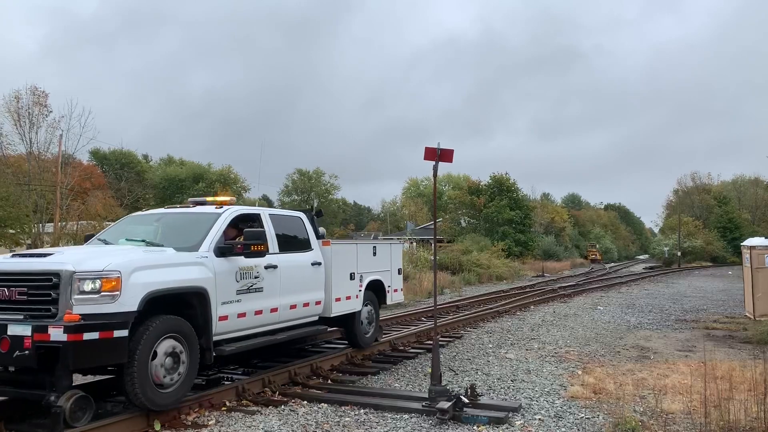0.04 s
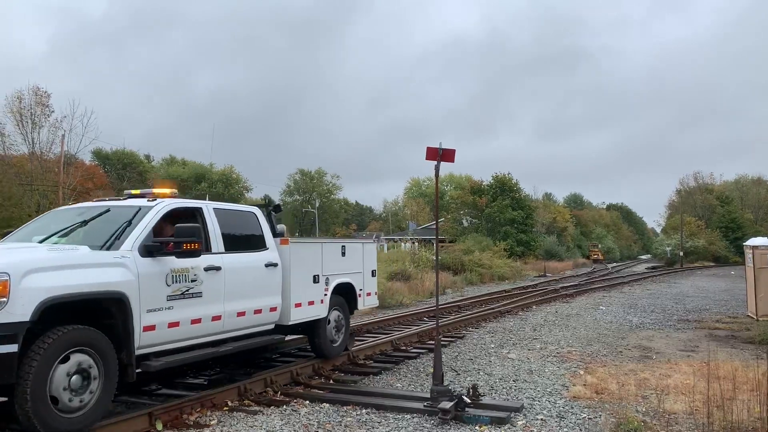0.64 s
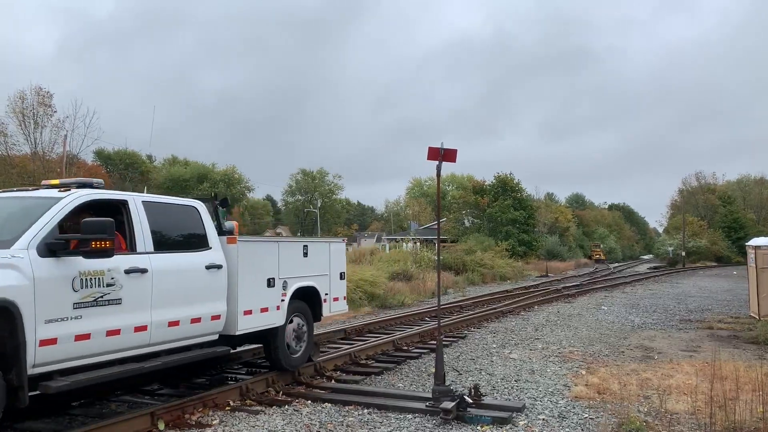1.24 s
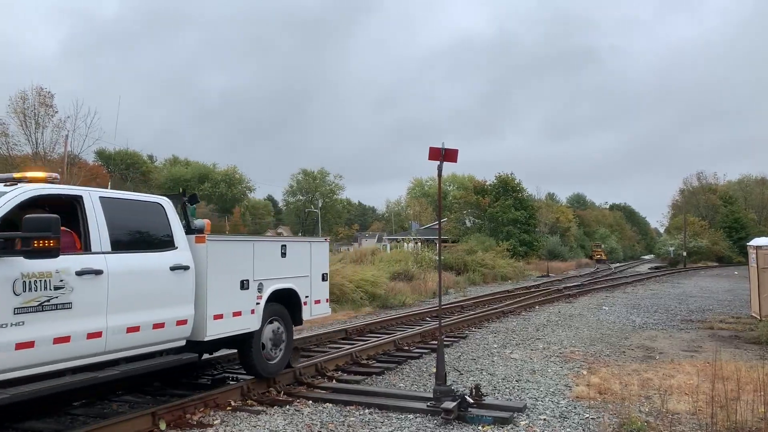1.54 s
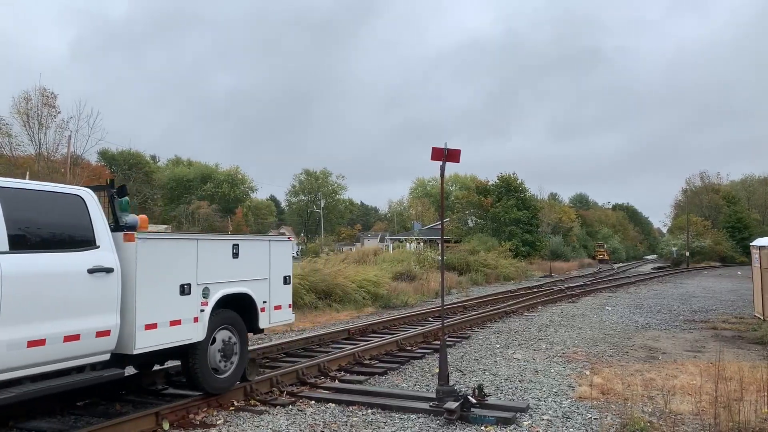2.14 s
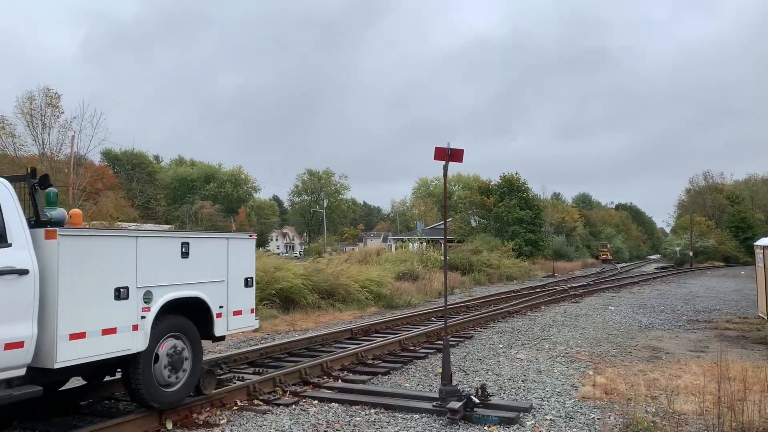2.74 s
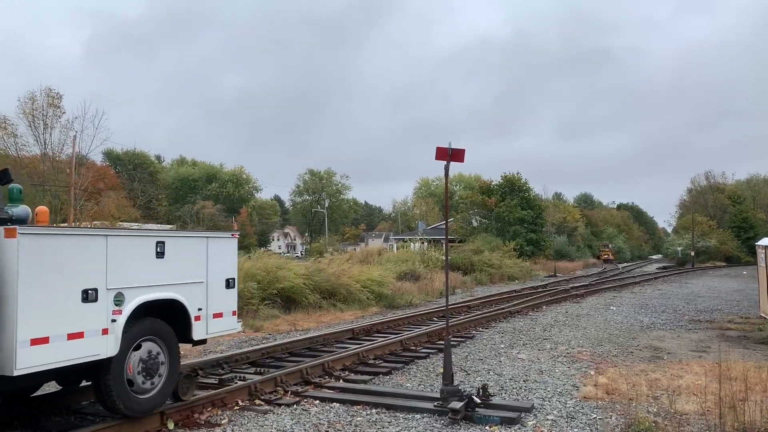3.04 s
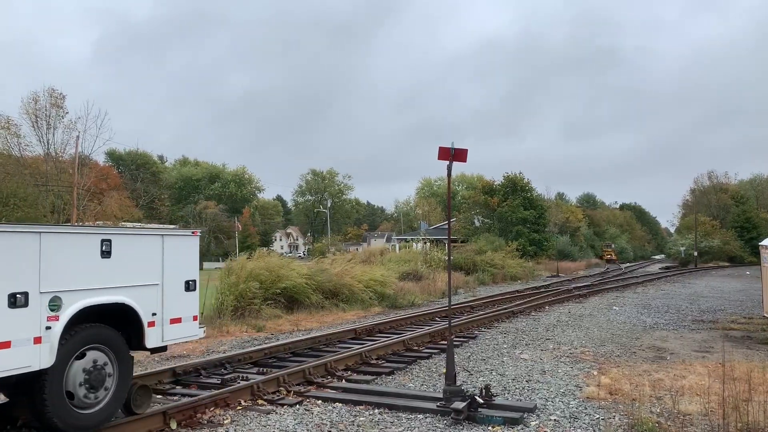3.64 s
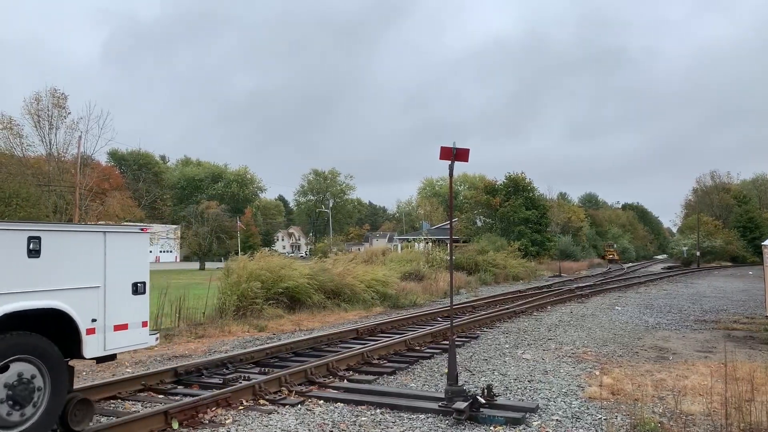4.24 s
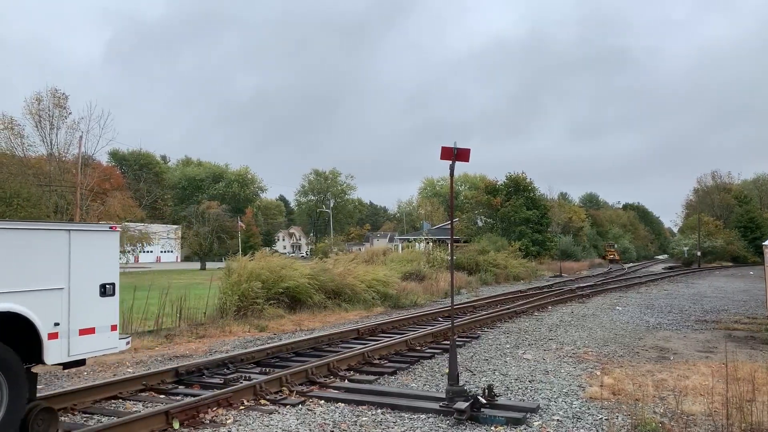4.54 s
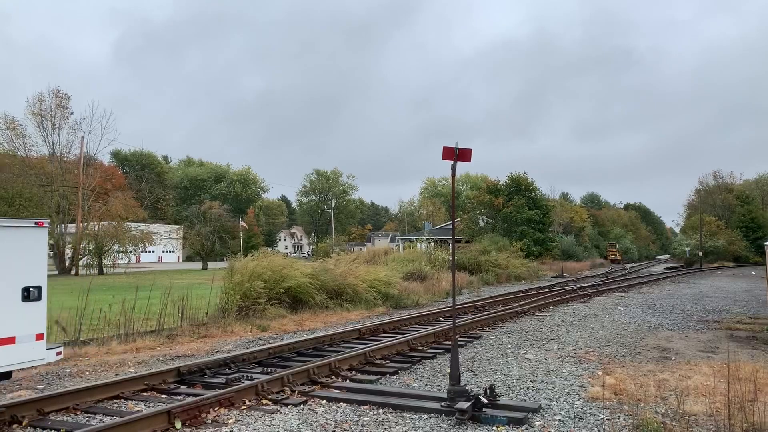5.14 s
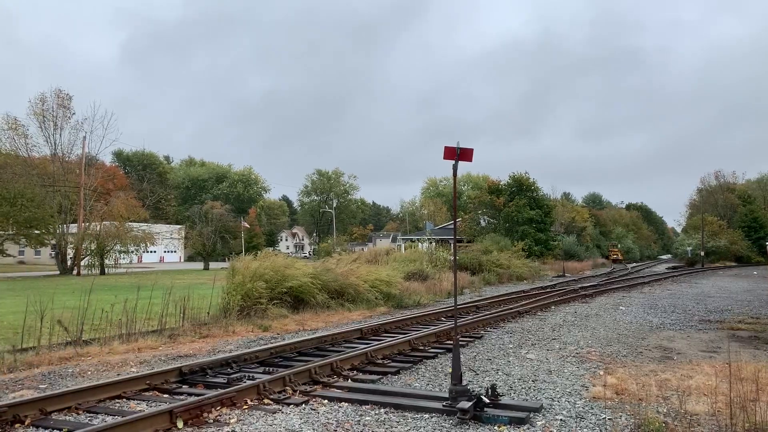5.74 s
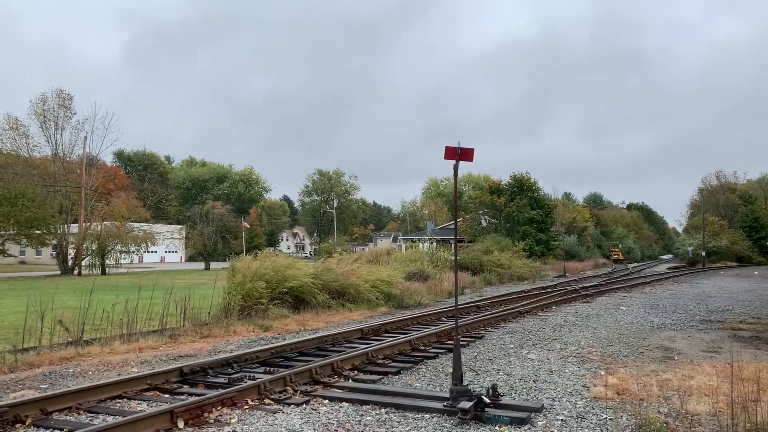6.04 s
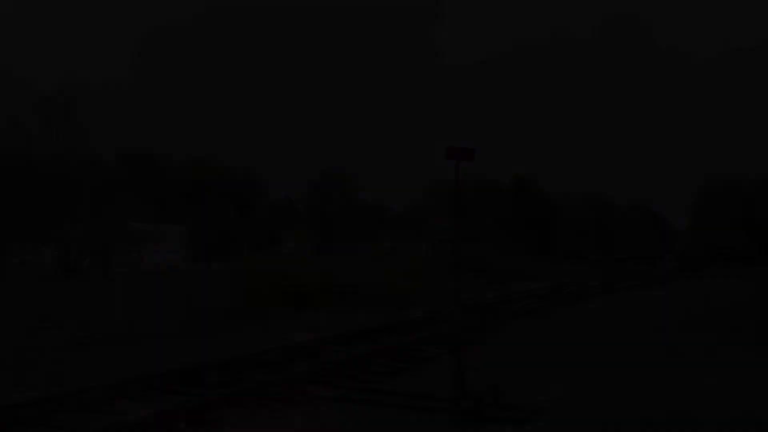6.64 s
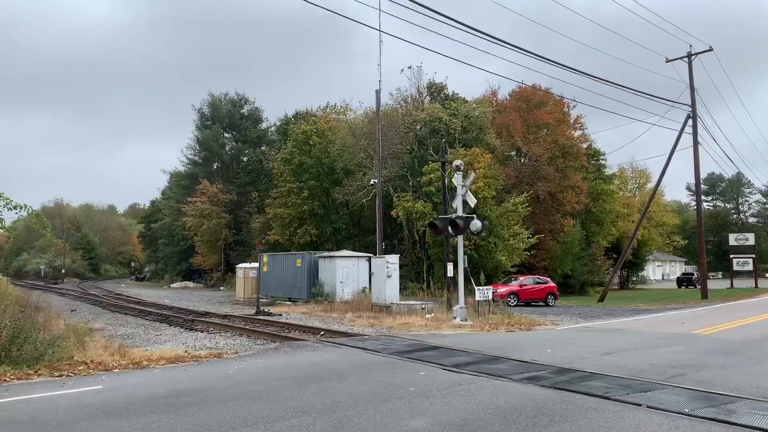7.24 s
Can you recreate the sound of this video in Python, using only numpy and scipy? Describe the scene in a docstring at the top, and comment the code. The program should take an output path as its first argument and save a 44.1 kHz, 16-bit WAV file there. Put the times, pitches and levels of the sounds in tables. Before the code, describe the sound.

A pickup truck rolls slowly along railway tracks, close and to the left, with a steady low engine hum and a lumpy, groaning rumble from its steel guide wheels. The wheels knock and thump over rail joints at about 0.2, 0.4 and 1.7 seconds, sharply at 2.9, and again at 4.3, with a few brief, thin squeaks and slight crunches of grit. The rumble gradually eases as the truck moves by. A faint cricket chirps throughout, and dry insect ticks join from about 3.7 seconds. Near 6 seconds the engine revs up, its exhaust booming and its hiss growing, with two more clanks around 6.3 and 6.6. At about 6.6 seconds the sound cuts to quieter open air: distant traffic, a far idling engine, two small ticks and a very faint bird note, ending around 7.5 seconds.

```python
"""Hi-rail pickup rolling by

A pickup idles slowly past on the track, its steel guide wheels roaring, groaning and knocking over the
joints of a switch. Once it is by, the V8 revs up; a cricket and a katydid scrape their wings on the
verge. At 6.645 s the scene cuts to a level crossing with distant traffic and a far idling engine."""
import sys
import numpy as np
from scipy import signal
from scipy.io import wavfile
from scipy.ndimage import map_coordinates

SR = 44100
rng = np.random.default_rng(int(sys.argv[2]) if len(sys.argv) > 2 else 0)


def store_pcm(level_fs):
    """Save levels as 16-bit WAV."""
    pcm = np.round(np.clip(level_fs, -1, 1) * 32767).astype(np.int16)
    wavfile.write(sys.argv[1], SR, np.atleast_2d(pcm).T)


N = 330750
TIME = np.arange(N) / SR
CUT_S, IDLE_FIRINGS_PER_S = 6.645, 41

# Levels are in dB; some layers add an overall gain.
# engine speed, idling and then revving up: t/s, firing rate/Hz
ENGINE_SPEED = [(0, 40.5), (5.9, 44.1), (6.0, 48.5), (6.16, 65.2), (6.3, 83), (6.45, 88), (6.62, 87)]
# drone of the engine block: multiple of the firing rate, level/dB
BLOCK_ORDERS = [(1, -39), (2, -39.5)]
# note of the tailpipe: multiple of the firing rate, level/dB
PIPE_ORDERS = [(1, 8.5), (2, 3), (4, -12)]
# exhaust response, with two booms that the rising note sweeps through: f/Hz, level/dB
MUFFLER = [(41, -13), (64, 11.5), (82, 1.5), (130, -3.5), (156, 13), (170, -10), (360, -1)]
# tailpipe resonances: low f/Hz, high f/Hz, level/dB
PIPE_BANDS = [(149, 183.4, -1.5), (251, 316, -10)]
# the rear of the truck comes round: t/s, tailpipe level/dB, whir level/dB
REAR_LEVELS = [(0, -35.5, -60), (2.5, -61.5, -90), (4, -45.5, -59), (5, -43, -52.5), (5.9, -40.5, -57)]
# hum of the cooling fan: t/s, f/Hz, level/dB
FAN_HUM = [(0, 103, -32.5), (1.2, 97.36, -36.5), (2.5, 96.73, -34.5), (5.9, 98.24, -37.5), (6.4, 108, -37)]
# spectra of the engine bay's rush and high hiss: f/Hz, level/dB
RUSH_SPECTRUM = [(230, 1.5), (420, 2), (620, 1.1), (850, 0.5), (1200, -3), (1700, -5.5), (2200, -9),
                 (2900, -10.5), (3500, -18.5), (4300, -14.5), (5400, -20.5), (6600, -20.5), (9000, -75)]
HISS_SPECTRUM = [(5200, -9), (7000, 0), (8400, 2.5), (9800, -1), (11500, -4), (13000, 1.5), (14200, 1.5),
                 (16500, -6)]
# frequency bands of the revving engine's rasp: low f/Hz, high f/Hz, level/dB
RASP_BANDS = [(1275, 1350, -3), (1770, 2030, 2.5), (2290, 2950, 2.5), (3770, 4080, -2.5), (4140, 4770, -2)]
# bands of a fluttering midrange whir: low f/Hz, high f/Hz, level/dB, flutter/dB
WHIR_BANDS = [(1710, 2800, 0.8, 0.1), (2120, 2220, -2.5, 3), (3730, 4460, -9.5, 1), (4010, 4035, -16, -1)]
# the truck's bearing: t/s, base right-channel lag/ms
BEARING = [(0, 0.2), (1, 0.24), (2, 0.31), (3, 0.39), (4.5, 0.39), (6.6, 0.46)]
# stereo image of truck, hiss and road: f/Hz, left-right likeness (1 is mono)
TRUCK_LIKENESS = [(60, 1), (200, 0.99), (700, 0.96), (1400, 0.93), (2500, 0.82), (4500, 0.29),
                  (7000, 0.027)]
HISS_LIKENESS = [(6000, .6), (8500, .87), (14000, .87)]
ROAD_LIKENESS = [(60, 1), (300, 0.63), (1200, 0.17), (3000, 0.24), (8000, 0.22)]

# spectra of chassis shudder and guide-wheel roar: f/Hz, level/dB
SHUDDER_SPECTRUM = [(28, -32), (45, 0.5), (65, 0.5), (100, -3), (140, -12)]
ROAR_SPECTRUM = [(85, 3.5), (140, 3), (230, -3.5), (320, -4.5), (450, -15.5), (580, -11.5), (740, -12.5),
                 (1000, -32), (1400, -28), (2600, -33.5)]
# tyres jolting over rough spots of the switch: t/s, level/dB
JOLTS = [(.45, -41), (1.66, -25.5), (2.8, -33), (4.19, -31.5)]
# roughness of the rail: t/s, level/dB
RAIL_ROUGHNESS = [(0, 3), (.22, 0.5), (.58, -2.5), (.67, -4.5), (.95, -0.5), (1.25, 1.5), (1.45, 0.5),
                  (1.7, 4), (1.92, -0.5), (2.35, -2), (2.9, -2)]
# guide-wheel groans: t/s, f/Hz, level/dB, half length/s
SCRUBS = [(0.12, 191, -34.5, 0.14), (0.044, 380, -42.5, 0.088), (.4, 159.6, -38, 0.13),
          (.57, 206, -34.5, 0.049), (0.803, 369, -36, 0.13), (1.175, 209, -29.5, 0.039),
          (1.37, 212, -30, 0.2), (1.68, 260, -35.5, 0.13), (1.888, 670, -42.5, 0.49),
          (3.997, 528, -40.5, 0.3)]
# wheels over joints: t/s, bump level/dB, thump level/dB, clank level/dB, clank low-pass f/Hz,
# pitch factor, clank pan to the left/dB, right-channel lag/ms
JOINT_HITS = [(.164, -24, -26, -12, 1900, 1, 2.5, 0.43), (.197, -28, -18.5, -30, 2000, 0.97, 8, 0.15),
              (.432, -12, -31, -46, 1500, 0.88, 9, 0.3), (1.617, -12, -24, -32, 1500, 0.89, -7, .59),
              (1.703, -38, -30, -27, 2000, 0.96, 2, 0.2), (1.746, -9, -26, -29, 1500, 0.94, -1, 0.37),
              (2.898, -33, -9, -14.5, 2600, 0.99, 7, 0.32), (2.906, -23, -17.5, -19.5, 2000, 0.88, 7, 0.31),
              (4.255, -38, -19, -16, 1060, 0.96, 5, 0.46), (4.269, -15, -18, -33, 910, 0.88, 5, 0.36),
              (4.323, -51.5, -45, -28, 3000, 1.0, 1, 0.49), (6.333, -37, -20, -13, 2200, 0.89, 1.5, 0.47),
              (6.59, -38, -33, -23, 1200, 0.92, 4, 0.49)]
# modes of wheel, axle and rail (clank, thump) and of the chassis (bump): f/Hz, level/dB, t60/s
CLANK_MODES = [(470, -5, .04), (581, -3.5, .05), (715, -2.5, .055), (807, 1.5, .065), (1005, -5.5, .06),
               (1175, -1, .055), (1300, -5.5, .05), (1420, -12, .05), (1670, -17, .05)]
THUMP_MODES = [(150, -1.5, .045), (185, 1.5, .055), (250, 1.5, .065), (335, -.5, .06)]
BUMP_MODES = [(59, 3.5, .05), (95, -1, .04)]
# grit crushed under a wheel: t/s, level/dB, t60/s
GRIT = [(.165, -43, 0.18), (.197, -47.5, 0.16), (2.9, -50.5, 0.34)]
# flange squeaks: peak t/s, f/Hz, level/dB, rise/s, t60/s
SQUEAKS = [(0.202, 8570, -42, 0.0073, 0.093), (1.644, 5489, -46, 0.018, 0.14),
           (1.671, 5489, -41.5, 0.01, 0.19), (3.54, 8646, -45, 0.011, 0.11)]

# cricket chirps: t/s, level/dB, crescendo across the full strokes/dB
CHIRPS = [(0.506, -56, 1), (1.332, -55.5, -5), (2.031, -55.5, -1), (2.682, -59, 3), (3.435, -55.5, -3),
          (4.497, -59, 1), (5.179, -56.5, 0), (5.983, -57.5, -2)]
# a chirp's soft lead-in and three wing strokes: t/s from the first full one, level/dB, half length/s
WING_STROKES = [(-.05, -7, .006), (0, 1, .0065), (.065, .5, .0085), (.139, .5, .0085)]
# katydid wing ticks: t/s, f/Hz, level/dB
KATYDID_TICKS = [(3.718, 8900, -54), (3.758, 9200, -54), (3.802, 9100, -52.5), (3.848, 9200, -51),
                 (3.897, 9200, -49), (3.942, 9400, -46), (4.027, 9300, -51), (4.07, 8300, -45),
                 (4.112, 9900, -48), (4.159, 8700, -50), (4.202, 9000, -52), (4.289, 8700, -48),
                 (4.329, 8450, -47), (4.411, 8140, -48), (4.491, 8560, -50), (5.459, 9000, -46.5),
                 (6.021, 8600, -54), (6.062, 8600, -52)]

# spectrum of distant traffic: f/Hz, level/dB
TRAFFIC_SPECTRUM = [(28, -21), (65, 1.5), (85, -4), (130, -19), (200, -20), (350, -20.5), (550, -25.5),
                    (800, -26.5), (1100, -24.5), (1900, -36.5), (2800, -41), (4600, -48.5), (8000, -56.5),
                    (12000, -93)]
# far idling engine: f/Hz, level/dB, pitch wander as a share of f
FAR_ENGINE_TONES = [(44, -37, 0.012), (69.96, -39, 0.071)]
# far-off tyre drone, whir and insects: low f/Hz, high f/Hz, level/dB
FAR_BANDS = [(343, 408, -56), (476, 1000, -60), (950, 1240, -54.5), (2010, 2220, -56), (4620, 4760, -75.5)]
# small ticks at the crossing: t/s, level/dB
FAR_TICKS = [(6.775, -24), (7.348, -33)]
# a distant bird's notes: t/s, f/Hz, level/dB, half length/s
BIRD_NOTES = [(7.138, 5440, -69, 0.07), (7.17, 3580, -64, 0.077)]


def from_db(db):
    """Decibels to gain."""
    return 10 ** (np.asarray(db) / 20)


def rms_one(x):
    """Scale to rms 1."""
    return x / np.sqrt(np.mean(x ** 2) + 1e-20)


def in_time(rows):
    """Each column of an automation curve, at every sample."""
    times, *columns = np.transpose(rows)
    return [np.interp(TIME, times, column) for column in columns]


def at_hz(points, hz):
    """Read a spectrum on a log-frequency axis."""
    freqs, values = np.transpose(points)
    return np.interp(np.log(hz), np.log(freqs), values)


def drift(rate_hz):
    """Smooth random modulation, rms about 1."""
    step, settle = 40, 2000
    pole = np.exp(-2 * np.pi * step * rate_hz / SR)
    white = rng.standard_normal(N // step + settle + 2)
    slow = signal.lfilter([1], [1, -2 * pole, pole * pole], white)[settle:]
    return np.interp(np.arange(N) / step, np.arange(len(slow)), rms_one(slow))


def band(x, low_hz, high_hz):
    """Band-pass."""
    edges = [low_hz, min(high_hz, SR / 2 - 500)]
    return signal.sosfilt(signal.butter(2, edges, "band", fs=SR, output="sos"), x)


def noise(low_hz, high_hz, shape=N):
    """One band of noise, rms 1."""
    return rms_one(band(rng.standard_normal(shape), low_hz, high_hz))


def noise_bed(spectrum, likeness, flicker_db, flicker_hz, bands):
    """Stereo noise in bands, each with its own level, flicker and width; rms 1."""
    out, together = 0, drift(flicker_hz)
    edges = np.geomspace(spectrum[0][0], spectrum[-1][0], bands + 1)
    white = rng.standard_normal((2, 2, N))
    for k, (low, high) in enumerate(zip(edges, edges[1:])):
        mid, side = band(white[k % 2], low, high)
        hz = np.sqrt(low * high)
        alike = np.clip(at_hz(likeness, hz), -1, 1)
        gain = from_db(at_hz(spectrum, hz) + flicker_db * (together + drift(flicker_hz)) / 2)
        out = out + gain * (np.sqrt(1 + alike) * mid + np.sqrt(1 - alike) * side * [[1], [-1]])
    return rms_one(out)


def tone(hz, wander, waver_db):
    """A sine of rms about 1 whose pitch and level waver."""
    turns = np.cumsum(hz * (1 + wander * (drift(5.58) + drift(64.4)) / np.sqrt(2))) / SR
    return np.sqrt(2) * np.sin(2 * np.pi * turns) * from_db(waver_db * drift(3.3))


def ring(force, modes, pitch=1):
    """A force sets modes ringing as decaying sines of alternating polarity."""
    out = 0
    for k, (hz, db, t60) in enumerate(modes):
        r, w = from_db(-60 / (t60 * SR)), 2 * np.pi * hz * pitch / SR
        mode = signal.lfilter([0, np.sin(w)], [1, -2 * r * np.cos(w), r * r], force + 1e-18)
        out = out + (-1) ** k * from_db(db) * mode
    return out


def place(x, lag_ms, pan_db):
    """Pan by time and level; positive values pull to the left."""
    left, right = np.broadcast_to(x, (2, x.shape[-1]))
    late = map_coordinates(right, [np.arange(len(right)) - lag_ms * SR / 1000], order=3, mode="nearest")
    return np.array([left * from_db(pan_db / 2), late * from_db(-pan_db / 2)])


def swells(rows, half_length_s):
    """Gain of a smooth rise and fall round each event."""
    return sum(from_db(db) * np.exp(-((TIME - s) / half_length_s) ** 2) for s, db in rows)


def passing(nearest_s, fall_s):
    """Pass-by gain, one over distance: 1 when nearest, 3 dB down fall_s later."""
    return 1 / np.sqrt(1 + ((TIME - nearest_s) / fall_s) ** 2)


def revving(power):
    """Gain that grows as a power of engine speed, 1 at idle."""
    firing_hz, = in_time(ENGINE_SPEED)
    return (firing_hz / IDLE_FIRINGS_PER_S) ** power


def throb(angle, depth):
    """Gain that peaks at each firing; rms 1."""
    return rms_one(np.exp(depth * np.cos(angle)))


def block_drone(angle):
    """The engine block drones at multiples of the firing rate."""
    orders = sum(from_db(db + drift(1.0)) * np.cos(k * angle) for k, db in BLOCK_ORDERS)
    return np.sqrt(2) * passing(nearest_s=0.089, fall_s=1) * orders


def exhaust(firings, firing_hz, uneven_db=4.5, turbulence=0.032):
    """The tailpipe booms through the muffler and burbles as eight cylinders puff unequally."""
    angle = 2 * np.pi * firings
    note = sum(from_db(db + at_hz(MUFFLER, k * firing_hz) + drift(5.4)) * np.sin(k * angle)
               for k, db in PIPE_ORDERS)
    cylinder_db = uneven_db * rng.permutation(np.linspace(-1, 1, 8))
    puff_db = cylinder_db[firings.astype(int) % 8] + drift(47)
    puffs = np.diff(np.floor(firings), prepend=0) * from_db(puff_db)
    gas = puffs + turbulence * rng.standard_normal(N) * (1 + np.cos(angle))
    burble = sum(from_db(db) * rms_one(band(gas, low, high)) for low, high, db in PIPE_BANDS)
    pipe_db, _ = in_time(REAR_LEVELS)
    return from_db(pipe_db) * revving(0.12) * (np.sqrt(2) * note + burble)


def fan_hum():
    """The cooling fan hums on one low, unsteady note."""
    hz, db = in_time(FAN_HUM)
    return from_db(db) * tone(hz, wander=0.0069, waver_db=0.4)


def bay_rush(angle, level_db=-40.5):
    """Air rushes from the engine bay, throbbing with each firing."""
    air = noise_bed(RUSH_SPECTRUM, TRUCK_LIKENESS, flicker_db=2.5, flicker_hz=14.7, bands=16)
    gain = from_db(level_db) * passing(nearest_s=0.28, fall_s=4.96) * revving(1.59)
    return gain * throb(angle, 0.03) * air


def engine_hiss(angle, level_db=-55.5, swish_hz=3.4, swish_db=0.15):
    """The engine's high hiss swishes gently and climbs steeply with the revs."""
    air = noise_bed(HISS_SPECTRUM, HISS_LIKENESS, flicker_db=1.8, flicker_hz=22, bands=10)
    swish = from_db(level_db + swish_db * np.cos(2 * np.pi * swish_hz * TIME))
    return swish * passing(nearest_s=0.95, fall_s=2.3) * revving(2.95) * throb(angle, 0.077) * air


def engine_rasp(angle, level_db=-64.5, uneven_db=3.0):
    """An uneven rasp, hushed at idle, grows as the engine revs."""
    air = sum(from_db(db + uneven_db * drift(40)) * noise(low, high, (2, N))
              for low, high, db in RASP_BANDS)
    return from_db(level_db) * revving(2.19) * throb(angle, 0.11) * air


def engine(wander=0.0058):
    """A V8 on one slightly wandering firing clock, as three stems: drone, rush and hiss."""
    firing_hz, = in_time(ENGINE_SPEED)
    firings = np.cumsum(firing_hz * (1 + wander * drift(5.9))) / SR
    angle = 2 * np.pi * firings
    drone = block_drone(angle) + exhaust(firings, firing_hz) + fan_hum()
    rush, hiss = bay_rush(angle), engine_hiss(angle)
    return drone, rush + engine_rasp(angle), hiss


def chassis_shudder(floor_db=-37.5):
    """The rolling chassis shudders in the deep bass, most at each jolt."""
    shaking = np.hypot(from_db(floor_db), swells(JOLTS, half_length_s=0.2))
    bass = noise_bed(SHUDDER_SPECTRUM, TRUCK_LIKENESS, flicker_db=-4.5, flicker_hz=11.3, bands=6)
    return shaking * bass


def wheel_gain(level_db=-28):
    """The guide wheels swell on rough rail, fade as they roll away and pick up when the engine pulls."""
    rough_db, = in_time(RAIL_ROUGHNESS)
    return from_db(level_db + rough_db) * passing(nearest_s=0.012, fall_s=1) * revving(1)


def wheel_roar():
    """Rough rail shakes the guide wheels into a lumpy roar."""
    roar = noise_bed(ROAR_SPECTRUM, TRUCK_LIKENESS, flicker_db=3.0, flicker_hz=10.2, bands=14)
    return wheel_gain() * roar


def midrange_whir(flutter_hz=9):
    """A fluttering midrange whir, clearer once the truck is by."""
    _, level_db = in_time(REAR_LEVELS)
    whir = sum(from_db(db + flutter_db * drift(flutter_hz)) * noise(low, high)
               for low, high, db, flutter_db in WHIR_BANDS)
    return from_db(level_db) * whir


def wheel_taps(per_s=7, level_db=-14):
    """Small flaws in the rail tap the guide wheels at random, louder while they are near."""
    knocks = (rng.random(N) < per_s / SR) * rng.uniform(-1.1, 1, N)
    return ring(knocks * from_db(level_db) * wheel_gain(), CLANK_MODES)


def wheel_groans(spread=1.11, lumpy_db=2.5):
    """Each scrub of a guide wheel excites one low resonance of its axle, in lumpy surges."""
    out = 0
    for s, hz, db, half_length_s in SCRUBS:
        groan = from_db(lumpy_db * drift(22)) * noise(hz / spread, hz * spread)
        out = out + swells([(s, db)], half_length_s) * rms_one(groan)
    return out


def blow(modes, pitch, contact_s, rattle, rattle_s=0.012):
    """A short contact and a rattle of loose parts ring the modes, pitched by the spot struck."""
    t = TIME[:SR // 2]
    contact = np.exp(-t / contact_s)
    loose_parts = rattle * rng.standard_normal(len(t)) * np.exp(-t / rattle_s)
    return ring(contact / contact.sum() + loose_parts, modes, pitch)


def rail_joints(landing_s=0.00293, crack_s=0.0052):
    """A wheel cracks and clanks on the rail end; the weight lands with a thump and bumps the chassis."""
    out, t = np.zeros((2, N + SR)), TIME[:SR // 2]
    for s, bump_db, thump_db, clank_db, top_hz, pitch, pan_db, lag_ms in JOINT_HITS:
        burst = rms_one(band(noise(250, 2200, len(t)), 250, 2200))
        crack = from_db(-4.5) * np.exp(-t / crack_s) * burst
        steel = blow(CLANK_MODES, pitch, contact_s=0.00008, rattle=0.04)
        lowpass = signal.butter(3, top_hz, fs=SR, output="sos")
        clank = from_db(clank_db - 8) * signal.sosfilt(lowpass, crack + steel)
        thump = blow(THUMP_MODES, pitch, contact_s=0.00037, rattle=0.012)
        bump = blow(BUMP_MODES, pitch, contact_s=0.0012, rattle=0.004, rattle_s=0.015)
        landing = from_db(thump_db - 1.5) * thump + from_db(bump_db + 0.5) * bump
        for start_s, sound, side_db in ((s, clank, pan_db), (s + landing_s, landing, 0)):
            at = round(start_s * SR)
            out[:, at:at + len(t)] += place(sound, lag_ms, side_db)
    return out[:, :N]


def grit_crunch():
    """Grit crushed under the wheels gives bright, fading bursts."""
    crush = sum(from_db(db - 60 * np.abs(TIME - s) / t60) * (TIME > s) for s, db, t60 in GRIT)
    return crush * noise(6900, 9900, (2, N))


def flange_squeaks(wander=0.00151):
    """A flange catches the rail with a squeak that rings away."""
    out = 0
    for s, hz, db, rise_s, t60 in SQUEAKS:
        angle = 2 * np.pi * np.cumsum(hz * (1 + wander * drift(20.7))) / SR
        partials = np.sin(angle) + 0.13 * np.sin(2 * angle) + 0.091 * np.sin(angle / 2)
        tail = from_db(db - 60 * np.abs(TIME - s) / t60)
        envelope = np.where(TIME < s, swells([(s, db)], rise_s), tail)
        out = out + envelope * from_db(drift(40)) * partials
    return place(np.sqrt(2) * out, lag_ms=0.399, pan_db=-7)


def cricket(centre_hz=4250, fall_hz_per_s=19000, gain_db=7.0):
    """Short, raspy wing strokes, each dropping in pitch as the wing slows."""
    out, t = np.zeros(N), TIME[:SR // 10] - 0.05
    for s, db, crescendo_db in CHIRPS:
        for after_s, stroke_db, half_length_s in WING_STROKES:
            off_hz, off_db, sag = rng.normal([0, 0, 1], [25, 0.6, 0.15])
            scrape = 0.04 * np.cumsum(rng.standard_normal(len(t)))
            turns = (centre_hz + off_hz) * t - sag * fall_hz_per_s * t ** 2 / 2
            stroke = np.sin(2 * np.pi * turns + scrape) * np.exp(-(t / half_length_s) ** 2)
            accent_db = stroke_db + crescendo_db * after_s / WING_STROKES[-1][0]
            at = round((s + after_s + t[0]) * SR)
            out[at:at + len(t)] += from_db(db + accent_db + gain_db + off_db) * stroke
    return out * (1 + 0.2 * drift(150))


def katydid(tick_s=0.0028, rustle_s=0.014, rustle=0.14, spread=1.075, gain_db=-3.0, grain_db=2.0):
    """Dry, gritty wing ticks, each at its own pitch and blurred by a faint rustle."""
    out, t = np.zeros(N), TIME[:SR // 10] - 0.05
    envelope = np.exp(-(t / tick_s) ** 2) + rustle * np.exp(-(t / rustle_s) ** 2)
    for s, hz, db in KATYDID_TICKS:
        teeth = noise(hz / spread, hz * spread, len(t))
        at = round((s + t[0]) * SR)
        out[at:at + len(t)] += from_db(db) * envelope * teeth
    return out * from_db(gain_db + grain_db * drift(300))


def crossing_ambience(traffic_db=-35.0):
    """A bed of distant tyres and insects, with the wavering hum of a far idling engine."""
    road = noise_bed(TRAFFIC_SPECTRUM, ROAD_LIKENESS, flicker_db=2.0, flicker_hz=19.0, bands=24)
    idling = sum(from_db(db) * tone(hz, wander, waver_db=1.4) for hz, db, wander in FAR_ENGINE_TONES)
    whir = sum(from_db(db) * noise(low, high) for low, high, db in FAR_BANDS)
    return from_db(traffic_db) * road + idling + whir


def far_ticks(decay_s=0.0015):
    """Two small, dry midrange ticks."""
    envelope = sum(from_db(db) * (TIME > s) * np.exp(-np.abs(TIME - s) / decay_s) for s, db in FAR_TICKS)
    return band(envelope * noise(1010, 1630), 1050, 1900)


def far_bird():
    """A thin call, its notes blurred by distance into narrow bands of noise."""
    return sum(swells([(s, db)], half_length_s) * noise(hz - 55, hz + 55)
               for s, hz, db, half_length_s in BIRD_NOTES)


def scene(bass_lag_factor=1.89, fade_s=0.03):
    """The truck on the left and the insects, then a quick dip into the crossing, off to the right."""
    lag_ms, = in_time(BEARING)
    drone, rush, hiss = engine()
    low_end = drone + chassis_shudder() + wheel_roar() + wheel_groans()
    # long waves bend round to the far side and so arrive later still
    rumble = place(low_end, bass_lag_factor * lag_ms, pan_db=0.2)
    mids = place(rush + midrange_whir() + wheel_taps(), lag_ms, pan_db=0.6)
    top = place(hiss, lag_ms=-0.2174, pan_db=-0.5)
    truck = rumble + mids + top + rail_joints() + grit_crunch() + flange_squeaks()
    insects = place(cricket() + katydid(), lag_ms=-0.223, pan_db=0.5)
    crossing = place(crossing_ambience() + far_ticks() + far_bird(), lag_ms=-0.19, pan_db=-1.5)
    fade_out = np.clip((CUT_S - TIME) / fade_s, 0, 1)
    fade_in = np.clip((TIME - CUT_S) / fade_s, 0, 1)
    return fade_out * (truck + insects) + fade_in * crossing


def record(dry, lean=0.14, low_cut_hz=32, high_cut_hz=15600):
    """Master EQ: the low mids lean left, and the deepest bass and the very top are cut."""
    coloured = dry + lean * band(dry, 396, 1040) * [[1], [-1]]
    thinned = signal.sosfilt(signal.butter(5, low_cut_hz, "high", fs=SR, output="sos"), coloured)
    return signal.sosfilt(signal.ellip(10, 0.1, 80, high_cut_hz, fs=SR, output="sos"), thinned)


dry = scene()
out = record(dry)
store_pcm(out)
```